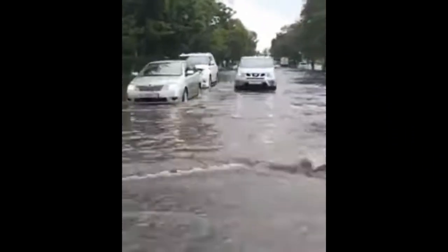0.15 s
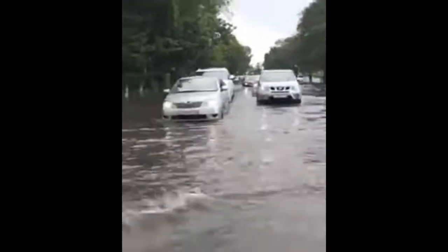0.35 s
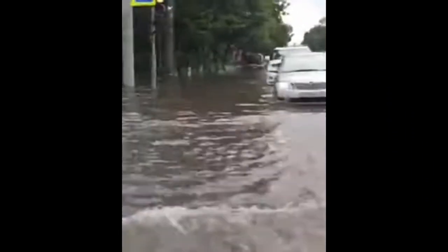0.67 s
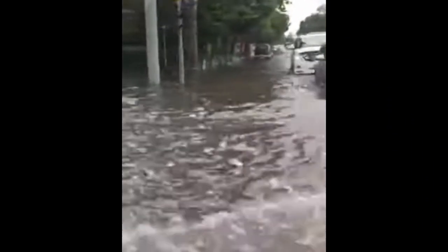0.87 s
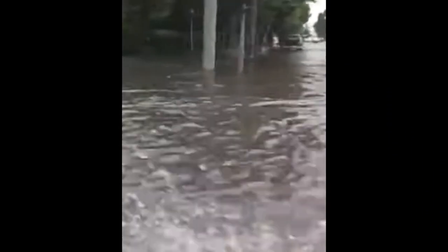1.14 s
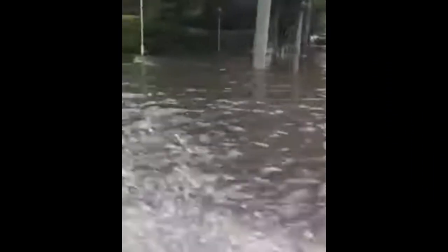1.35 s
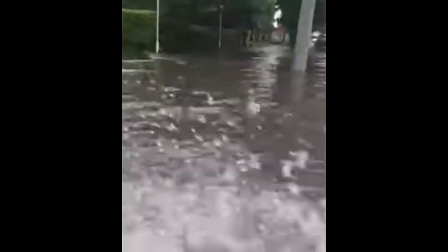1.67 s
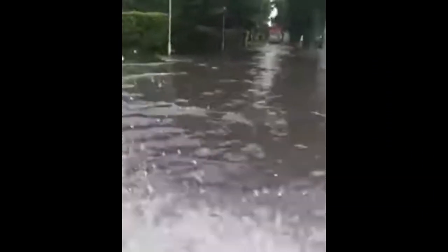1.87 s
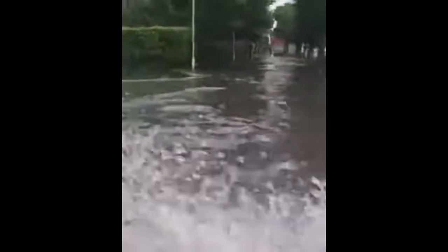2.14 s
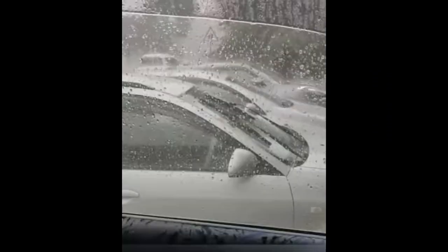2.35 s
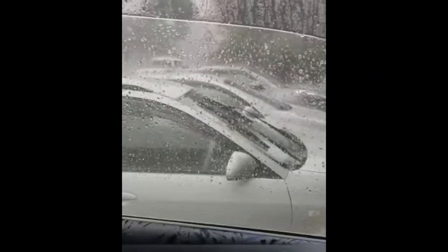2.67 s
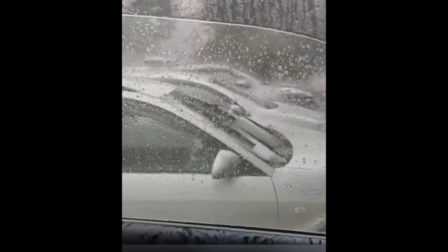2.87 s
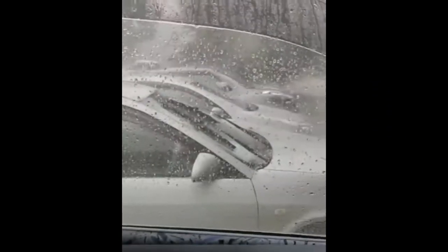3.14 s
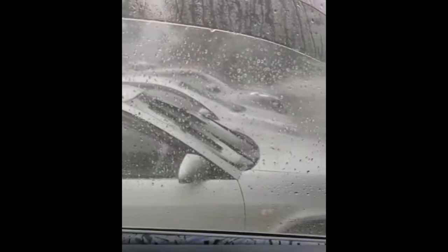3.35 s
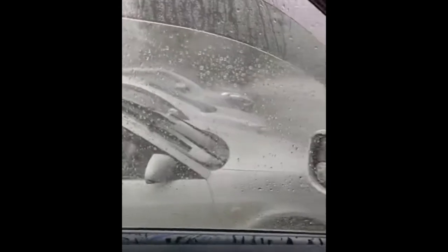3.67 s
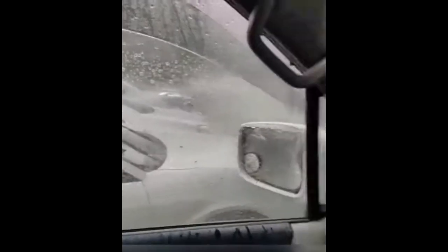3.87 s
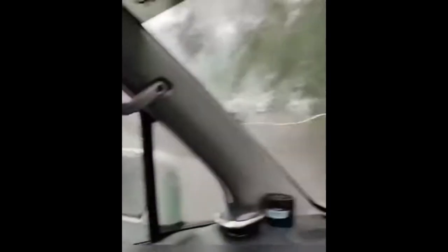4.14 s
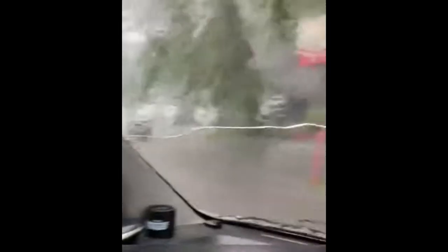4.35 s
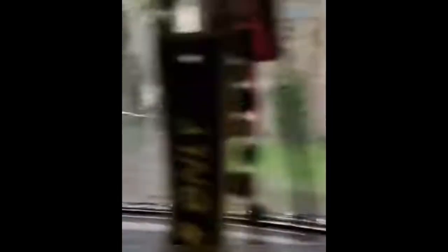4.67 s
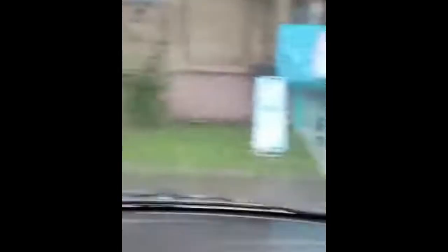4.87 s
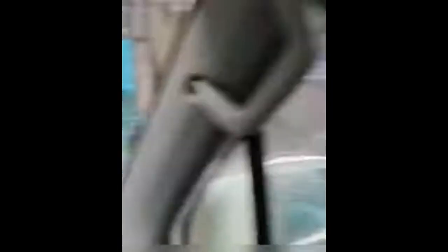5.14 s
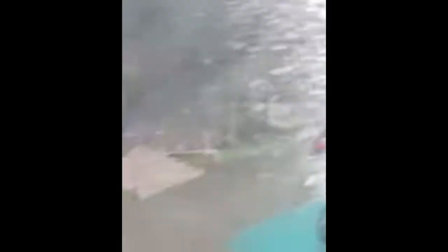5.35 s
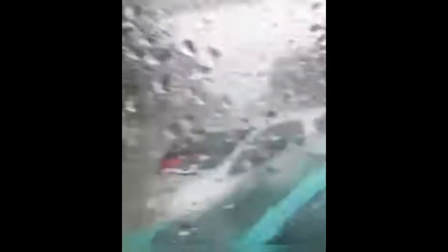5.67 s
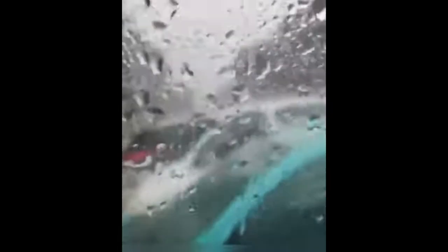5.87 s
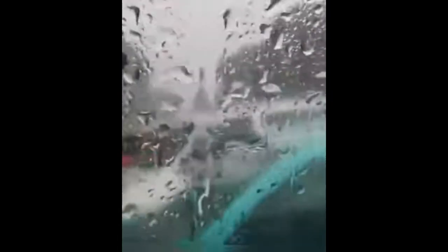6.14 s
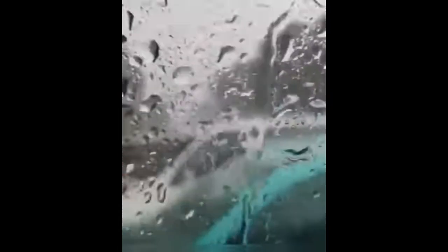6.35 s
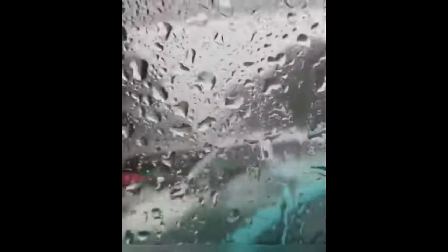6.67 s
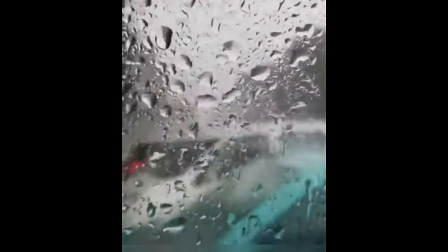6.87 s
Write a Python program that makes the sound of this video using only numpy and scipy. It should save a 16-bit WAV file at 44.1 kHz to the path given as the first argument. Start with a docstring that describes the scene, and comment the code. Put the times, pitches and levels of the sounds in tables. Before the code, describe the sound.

Loud, close splashing opens the scene as a car pushes through deep water: bubbling, fizzing foam and sheets of spray under thumping wind on the microphone. It stops suddenly, replaced by a softer downpour heard from within a shut car. Dense rain makes a dull roar overhead and a fine rattle on the windows, with scattered sharp drop taps, hissing runs of water and a slight body hum late on.

```python
"""Flooded street, then rain on a car

A car ploughs through a flood: wind buffets the microphone, bubbles ring in the churning bow wave and
spray sheets off the wheel. Then, abruptly, the inside of a closed car in a downpour: drop impacts drum
on the roof and patter on the glass, and washes of thrown water set a body panel humming in its modes."""
import sys
import numpy as np
from scipy import signal
from scipy.fft import rfft, irfft, next_fast_len
from scipy.io import wavfile
from scipy.ndimage import uniform_filter1d, map_coordinates

SR = 44100
rng = np.random.default_rng(int(sys.argv[2]) if len(sys.argv) > 2 else 0)


def wav_record(signal):
    """Record a signal, one row per channel, as 16-bit PCM in the file named by sys.argv[1]."""
    frames = np.transpose(np.atleast_2d(signal))
    bounded = np.clip(frames, -1, 1)
    # unit amplitude maps onto the largest positive 16-bit level
    quanta = np.round(bounded * 32767).astype(np.int16)
    wavfile.write(sys.argv[1], SR, quanta)


N = 309141
TIME = np.arange(N) / SR

# spectrum of the car body's dull response to water (frequency [Hz], relative density [dB])
BODY_SPECTRUM = [(13, -66), (22, -28), (65, -24), (95, -15), (125, -8), (170, -6.5), (204, -7), (246, -1),
                 (272, -6.5), (330, -5.5), (430, -2), (730, -120)]


def from_db(db):
    """Amplitude ratio: tenfold for every 20 dB."""
    return 10 ** (np.asarray(db) / 20)


def rms_one(x):
    """Normalisation to unit mean power."""
    return x / np.sqrt(np.mean(x ** 2) + 1e-20)


def curve(rows):
    """Linear interpolation of (time [s], value) rows at every sample."""
    times, values = np.transpose(rows)
    return np.interp(TIME, times, values)


def swell(centre_s, half_s):
    """Gaussian envelope of height 1, down to 1/e at half_s from its centre."""
    out = np.zeros(N)
    near = slice(*np.searchsorted(TIME, [centre_s - 4 * half_s, centre_s + 4 * half_s]))
    out[near] = np.exp(-((TIME[near] - centre_s) / half_s) ** 2)
    return out


def swells(rows):
    """Superposition of Gaussian envelopes, one track for each height column."""
    return sum(np.outer(heights, swell(centre_s, half_s)) for centre_s, half_s, *heights in rows)


def drift(corner_hz):
    """Slow random modulation: low-passed noise of rms 1."""
    step, settle = 40, 2000
    pole = np.exp(-2 * np.pi * corner_hz * step / SR)
    noise = rng.standard_normal(N // step + settle + 2)
    slow = signal.lfilter([1], [1, -2 * pole, pole * pole], noise)[settle:]
    return np.interp(np.arange(N) / step, np.arange(len(slow)), rms_one(slow))


def colour(excitation, spectrum):
    """Source and filter: impose a spectrum, falling 12 dB an octave below its first point; rms 1."""
    hz, db = np.transpose(spectrum)
    size = next_fast_len(N)
    bins = np.maximum(np.fft.rfftfreq(size, 1 / SR), 1)
    gain = from_db(np.interp(np.log(bins), np.log(hz), db)) * np.minimum(bins / hz[0], 1) ** 2
    return rms_one(irfft(rfft(excitation, size) * gain, size)[..., :N])


def band_limit(x, edges_hz, kind):
    """Second-order filter slopes: 12 dB an octave beyond each edge."""
    return signal.sosfilt(signal.butter(2, edges_hz, kind, fs=SR, output="sos"), x)


def ring(impulses, hz, t60):
    """Damped resonator: a unit impulse starts a unit sine that falls 60 dB in t60 seconds."""
    decay, angle = from_db(-60 / (t60 * SR)), 2 * np.pi * hz / SR
    return signal.lfilter([0, np.sin(angle)], [1, -2 * decay * np.cos(angle), decay ** 2], impulses + 1e-18)


def drops(per_s, spread_db):
    """Shot noise: random impacts, a few of them stronger (spread_db > 0) or weaker (< 0) than the rest."""
    spread, chance = rng.exponential(1, N), rng.random(N) * 2 - 1
    hit = np.flatnonzero(np.abs(chance) < per_s / SR)
    out = np.zeros(N)
    out[hit] = np.sign(chance[hit]) * from_db(spread_db * np.minimum(spread[hit], 5))
    return out


def pings(per_s, spread_db, low_hz, high_hz, cycles, count=18):
    """Randomly struck resonators of many pitches, each falling 60 dB over the given cycles."""
    onsets, choice = drops(per_s, spread_db), rng.integers(0, count, N)
    pitches = np.geomspace(low_hz, high_hz, count)
    return rms_one(sum(hz * ring(onsets * (choice == k), hz, cycles / hz) for k, hz in enumerate(pitches)))


def wind():
    """Turbulent pressure at the microphone port: each hard gust pushes, then pulls, for a swing or two."""
    # spectrum of the eddies (frequency [Hz], relative density [dB])
    eddy_spectrum = [(13, -46), (22, -20), (43, -57), (75, 7), (102, 8), (145, 4.5), (280, -7.5),
                     (360, -38), (620, -120)]
    # airflow over the microphone (time [s], level [dB])
    airflow = [(0, -22.5), (.28, -26), (.42, -22), (.62, -24), (1.0, -30), (1.35, -27.5), (1.8, -20.5),
               (2.15, -28.5), (2.33, -22.5)]
    # brief changes in the smaller eddies, mostly lulls (time [s], half length [s], gain [dB])
    lulls = [(.02, .03, -2), (.272, .025, 5), (.565, .014, -2), (.82, .018, -9), (1.29, .03, 0),
             (1.84, 0.013, -8)]
    # the hardest gusts (time [s], envelope peak [dB], frequency [Hz], half length [cycles])
    buffets = [(0.059, -5.5, 139, 0.51), (0.222, -10, 118, 0.7), (0.327, -10, 132, 0.6),
               (0.344, -8, 135, 0.54), (0.375, -6, 130, 0.59), (0.388, -6, 190, 0.65),
               (0.425, -7.5, 200, 0.68), (0.441, -8, 128, 0.97), (0.469, -7, 160, 0.32),
               (0.592, -15, 179, 0.9), (0.607, -5.5, 199, 0.62), (0.623, -6, 125, 0.53),
               (0.69, -10, 150, 0.97), (0.71, -10, 140, 0.76), (0.723, -4, 150, 0.79),
               (0.764, -11, 110, 0.72), (0.776, -8, 140, 0.75), (0.849, -7, 170, 0.71),
               (0.881, -4, 133, 0.52), (0.956, -8, 139, 0.73), (0.97, -8, 150, 0.94),
               (0.981, -14, 175, 0.69), (1.066, -4, 115, 0.48), (1.087, -5.5, 179, 1.1),
               (1.16, -7.5, 218, 1.4), (1.227, -7, 155, 0.44), (1.335, -7.5, 164, 0.66),
               (1.391, -7.5, 129, 0.55), (1.405, -7.5, 120, 1.3), (1.539, -7, 165, 0.48),
               (1.719, -14, 165, 0.74), (1.791, -2, 175, 0.47), (1.88, -9, 170, 1.4), (1.89, -12, 168, 1.1),
               (2.012, -12, 190, 0.61), (2.226, -10, 212, 0.71), (2.24, -8.5, 144, 0.77),
               (2.308, -9, 187, 0.65), (2.318, -12, 139, 0.64), (2.393, -9, 172, 0.44)]
    eddies = colour(rng.standard_normal(N), eddy_spectrum) * from_db(0.9 * drift(27))
    out = from_db(curve(airflow) + swells(lulls)[0]) * rms_one(eddies)
    for time_s, peak_db, hz, half_cycles in buffets:
        cycles = (TIME - time_s) * hz
        near = np.abs(cycles) < 4
        gust = np.exp(-(cycles[near] / half_cycles) ** 2)
        swing = -from_db(peak_db) * np.sin(2 * np.pi * cycles[near])
        out[near] += gust * (swing - out[near])   # the gust displaces the smaller eddies
    return band_limit(out, edges_hz=38, kind="high")   # the slowest changes leak from the port


def bow_wave(churn_db, foam_db):
    """Bubble resonance over turbulent noise: big air pockets churn low, small ones fizz in the foam."""
    # spectrum of the churning water (frequency [Hz], relative density [dB])
    churn_spectrum = [(140, 3), (230, -0.5), (370, -2.5), (560, -6), (832, -9), (1150, -17.5), (1500, -42),
                      (2530, -120)]
    # spectrum of the foam (frequency [Hz], relative density [dB])
    foam_spectrum = [(620, 4.5), (1050, -6.5), (1230, -5.5), (1600, -3), (2300, -19.5), (2990, -29),
                     (5060, -120)]
    pockets = pings(per_s=900, spread_db=1.0, low_hz=229.6, high_hz=1250, cycles=8.5)
    fizz = pings(per_s=2200, spread_db=2.0, low_hz=918, high_hz=2600, cycles=19.5)
    churn = colour(pockets + from_db(-1.0) * rng.standard_normal(N), churn_spectrum)
    foam = colour(fizz + from_db(-2.5) * rng.standard_normal(N), foam_spectrum)
    return from_db(churn_db) * churn + from_db(foam_db) * foam


def spray(level_db, splash_db, sizzle_share=0.69):
    """Impact noise: droplets fall back in surges, some trapping a bubble; a thin sizzle lies on top."""
    # tone colour of the spray: a bright hiss in treble shelves, strongest near 7 kHz
    # (frequency [Hz], relative density [dB])
    hiss_colour = [(1240, -7), (2100, -1.5), (2670, -2), (3130, -0.5), (4400, -1), (4700, -1.5),
                   (4850, -8.5), (5420, -8.5), (6030, -6.5), (6180, 1), (7000, 1.5), (7480, 0.5),
                   (7620, 6.5), (7740, -4.5), (8450, -2.5), (8650, -27), (8920, -23), (9500, -28),
                   (12400, -60), (20900, -120)]
    # tone colour of the top sizzle: a band of hiss at 11.6-14 kHz (frequency [Hz], relative density [dB])
    sizzle_colour = [(5290, -45), (9000, -24), (9820, -13.5), (11000, -19), (11300, -17.5), (11600, 4),
                     (13400, 3.5), (14200, 3), (14400, -15), (14600, -24), (15600, -21)]
    droplets = rms_one(drops(per_s=16000, spread_db=2.0))
    bubbles = pings(per_s=450, spread_db=-5.5, low_hz=2116, high_hz=5140, cycles=52)
    splash = colour(droplets + from_db(-16.5) * bubbles, hiss_colour)
    sizzle = colour(droplets, sizzle_colour) * from_db(0.33 * drift(15))
    sizzle_db = -16.5 - (1 - sizzle_share) * splash_db   # follows only a share of each splash
    surge = from_db(level_db + .6 * drift(45))
    return surge * (splash + from_db(sizzle_db) * sizzle)


def big_gulps(attack_s=0.0021, rise_per_s=2.3):
    """Free oscillation: a large air pocket pinches off and rings, rising in pitch near the surface."""
    # the biggest air pockets (time [s], level [dB], starting frequency [Hz], t60 [s])
    gulps = [(.081, -8, 356, 0.074), (.159, -9, 283, 0.054), (0.403, -7, 326, .04), (.459, -8, 414, .05),
             (.523, -10, 255, 0.08), (.648, -8, 342, .04), (0.702, -8, 385, .04), (.835, -11, 306, .06),
             (.946, -20, 318, 0.037), (1.044, -6, 458, 0.044), (1.318, -5, 330, 0.043),
             (1.476, -4.5, 342, 0.045), (1.626, -13, 282, 0.05), (1.787, -9, 289, 0.036),
             (1.874, -8, 522, 0.034), (2.222, -11.5, 350, 0.059)]
    out = np.zeros(N)
    for time_s, db, hz, t60 in gulps:
        near = (TIME > time_s) & (TIME < time_s + t60)
        age = TIME[near] - time_s
        envelope = from_db(db - 60 * age / t60) * (1 - np.exp(-age / attack_s))
        out[near] += envelope * np.sin(2 * np.pi * hz * age * (1 + rise_per_s * age / 2))
    return out


def thumps(hz=41.2, half_s=0.0048):
    """Pressure pulses: each of the largest eddies shoves the air at the microphone port once."""
    # the largest eddies (time [s], envelope peak [dB])
    eddies = [(.435, -29), (.586, -20), (.722, -26), (.877, -20), (1.064, -25), (1.086, -17)]
    return sum(from_db(db) * swell(time_s, half_s) * np.sin(2 * np.pi * (hz * TIME + rng.random()))
               for time_s, db in eddies)


def street():
    """Common modulation: the wave's size and each splash drive both foam and spray, amid the wind."""
    # size of the bow wave, growing in deeper water (time [s], level [dB])
    wave_size = [(0, -1), (.3, .5), (.7, -2), (1.15, -1.7), (1.65, 2.9), (2.15, 4), (2.27, 0.5), (2.4, 2.5)]
    # churning in the wave (time [s], level [dB])
    churning = [(0, -24.5), (.08, -20), (.3, -20), (.55, -18), (1.05, -18), (1.35, -18.5), (1.8, -21),
                (2.1, -19.5), (2.25, -19), (2.41, -21)]
    # sheets flung up by the wheel (time [s], half length [s], spray gain [dB], foam gain [dB])
    splashes = [(.065, 0.04, 4.5, 0), (.21, 0.017, 3, -6), (.32, 0.045, 1, -3), (.5, .025, -0.5, 3.5),
                (.71, 0.018, 2, 5), (.84, 0.026, 7, 2), (.878, 0.015, 1, -2), (.935, 0.024, 3, 4.5),
                (1.022, .012, 5, 3), (1.055, 0.013, 3.5, 3), (1.15, 0.027, 2, 2.5), (1.30, 0.026, 4.2, 5),
                (1.385, 0.016, 0.5, 1), (1.46, .015, 1.5, -3), (1.525, 0.018, 2, 2.5),
                (1.605, 0.017, -0.5, 3), (1.645, 0.031, 3.5, 5), (1.69, .02, 2, -4), (1.785, 0.033, 2, -3),
                (1.955, 0.028, 3.5, 2.5), (2.085, 0.025, 2.5, 7), (2.2, 0.04, 3.5, 4.5),
                (2.29, 0.021, 4, 4), (2.36, .02, 2.5, 0)]
    wave_db = curve(wave_size)
    spray_swell_db, foam_swell_db = swells(splashes)
    churn_db = curve(churning) + 0.03 * drift(22)
    foam_db = -30.5 + 0.53 * wave_db + foam_swell_db
    spray_db = -28 + wave_db + spray_swell_db + .6 * drift(26)
    return wind() + thumps() + big_gulps() + bow_wave(churn_db, foam_db) + spray(spray_db, spray_swell_db)


def rain_on(spectrum, per_s, spread_db, width_ms, echo_db, right_db, strips=5):
    """Interaural delay: each strip of a struck panel has its own lag, amid the cabin's diffuse echo."""
    hits, strip = drops(per_s, spread_db), rng.integers(0, strips, N)
    delay_ms = width_ms * (strip + rng.random(N) - strips / 2) / strips
    left_arrival = np.clip(np.arange(N) + np.round(delay_ms * SR / 1000).astype(int), 0, N - 1)
    direct = rms_one(np.array([np.bincount(left_arrival, hits, N), hits]))
    echo = from_db(echo_db) * rng.standard_normal((2, N))
    balance = from_db(right_db * np.array([[-.5], [.5]]))
    return colour(direct + echo, spectrum) * balance


def body_boom():
    """Forced vibration: the rain shakes the whole body into a low boom."""
    # strength of the boom (time [s], level [dB])
    boom_level = [(2.44, -43), (3.7, -42), (4.3, -43), (4.75, -46.5), (5.2, -42), (5.9, -44), (6.2, -41),
                  (7, -45)]
    boom = rain_on(BODY_SPECTRUM, per_s=2500, spread_db=-1.5, width_ms=0.17, echo_db=-3, right_db=-6)
    return from_db(curve(boom_level)) * boom


def roof_rain():
    """Impact noise: dense drops merge into a dull roar through the roof."""
    # response of the roof (frequency [Hz], relative density [dB])
    spectrum = [(160, -41), (280, -6), (360, -4), (412, -5), (471, 1), (564, -0.5), (675, 0), (729, -1),
                (862, -0.5), (1300, -5.5), (1690, -26), (2860, -120)]
    return rain_on(spectrum, per_s=5000, spread_db=2.5, width_ms=0.41, echo_db=-6.5, right_db=1.9)


def windscreen_rain():
    """Impact noise: the windscreen radiates its drops as a mid-range rattle."""
    # response of the windscreen (frequency [Hz], relative density [dB])
    spectrum = [(680, -14), (1150, -11), (1320, -1.5), (1700, -0.5), (2030, -3.5), (2250, -8.5),
                (2470, -8.5), (4200, -35), (5460, -53), (9240, -120)]
    return rain_on(spectrum, per_s=3200, spread_db=1.0, width_ms=0.91, echo_db=-0.5, right_db=4.0)


def sheeting_water():
    """Diffuse noise: water hisses as it sheets down the side glass."""
    # spectrum of the running sheet (frequency [Hz], relative density [dB])
    spectrum = [(2060, -4.5), (3500, -1), (4130, -5), (5690, 2.5), (6900, -6.5), (8970, -38), (15200, -120)]
    return rain_on(spectrum, per_s=3100, spread_db=-0.5, width_ms=0.68, echo_db=7.0, right_db=4.5)


def glass_patter():
    """Impact noise: fine drops on the side glass sound in the high treble."""
    # tone colour of the high patter; above 12 kHz the treble falls away steeply (frequency [Hz], relative
    # density [dB])
    tone_colour = [(3760, -34), (6400, -3.5), (7260, 1.5), (9130, -15.5), (11200, -16), (11800, -20),
                   (12000, -50), (15600, -56), (22000, -120)]
    return rain_on(tone_colour, per_s=3900, spread_db=3.5, width_ms=0.53, echo_db=5.0, right_db=3.5)


def treble_shimmer():
    """Damped sinusoids: faint, short random pings at 3-8 kHz, toward either ear, make the treble shimmer."""
    # tone colour of the pings (frequency [Hz], relative density [dB])
    tone_colour = [(2900, 8), (3600, -4), (4400, -5.5), (5600, -3), (7200, -3), (8200, -7)]
    left, right = (pings(per_s=110, spread_db=1.0, low_hz=3000, high_hz=8000, cycles=170, count=30)
                   for _ in range(2))
    return colour(np.array([left + .5 * right, right + .5 * left]), tone_colour)


def glass_taps(rain_db):
    """Modal excitation: each drop stirs the modes of the glass differently; the fattest stand out."""
    # modes of the glass (frequency [Hz], gain [dB])
    modes = [(2450, 2), (2850, 10), (3250, 5), (5600, -16)]
    # single fat drops (time [s], impact level [dB])
    fat_drops = [(2.5657, -41), (2.6555, -40), (2.864, -38), (3.0591, -39), (3.5889, -46), (3.8238, -41),
                 (3.984, -40), (4.0708, -44), (4.42, -40), (4.681, -40), (5.9545, -50), (6.2518, -41),
                 (6.4648, -43), (6.5855, -42)]
    hits = drops(per_s=60, spread_db=-6.0) * from_db(-46 + rain_db)
    for time_s, db in fat_drops:
        hits[int(time_s * SR)] += from_db(db)
    ticks = np.zeros(N)
    for hz, db in modes:
        coupling = rng.uniform(.3, 1, N) * rng.choice([-1, 1], N)
        ticks += from_db(db) * ring(hits * coupling, hz, t60=0.012)
    return band_limit(ticks, edges_hz=[1500, 4500], kind="band")


def roof_drumming(rain_db, wander_db=3.0):
    """Modal resonance: roof modes stand out in turn as the rain wanders; heavy gushes boom briefly."""
    # modes of the roof (frequency [Hz], level at full downpour [dB])
    modes = [(355, -46), (520, -47.5), (680, -47.5), (885, -40.5), (1075, -43.5), (1750, -58), (2100, -48)]
    # gushes of heavy drops (time [s], half length [s], level [dB], ringing frequency [Hz])
    gushes = [(2.904, 0.043, -30.5, 362), (3.252, .02, -27.5, 843), (3.513, 0.027, -33, 520),
              (3.89, 0.063, -31, 900), (4.014, 0.017, -35, 520), (5.15, 0.022, -33, 725),
              (6.07, 0.043, -33, 290), (6.618, 0.041, -37, 372)]
    hits = drops(per_s=2000, spread_db=1.0)
    out = np.zeros(N)
    for hz, db in modes:
        out += from_db(db + rain_db + wander_db * drift(8.2)) * rms_one(ring(hits, hz, t60=0.1))
    for time_s, half_s, db, hz in gushes:
        gush = swell(time_s, half_s)
        ringing = gush * ring(hits, hz, t60=0.016)   # damped by its own water
        out += from_db(db) * ringing * np.sqrt(np.sum(gush ** 2) / np.sum(ringing ** 2))
    return band_limit(out, edges_hz=[260, 3000], kind="band")


def panel_hum(waver_share=0.0245):
    """Mass loading: running water shakes a panel's modes, and its weight makes their pitch waver."""
    # modes of the panel (frequency [Hz], relative level [dB], t60 [s])
    modes = [(176.4, 2, 0.3), (167, -7, 0.22), (241, 2.5, 0.15)]
    shaking = colour(rng.standard_normal(N), BODY_SPECTRUM)
    hum = sum(from_db(db) * rms_one(ring(shaking, hz, t60)) for hz, db, t60 in modes)
    warped_time = TIME + waver_share * np.cumsum(drift(2.95)) / SR
    hum = np.interp(warped_time, TIME, hum)
    running_power = uniform_filter1d(hum ** 2, size=SR // 5)
    return hum / np.sqrt(running_power + .01)   # evens out the level


def cabin():
    """Superposition: roof, glass and body radiate into the cabin under rain and thrown water."""
    # strength of the downpour (time [s], level [dB])
    downpour = [(2.44, 0), (3.35, -1.5), (3.7, 1.4), (4.05, -0.5), (4.45, -0.9), (4.8, -3.5), (5.1, -3.5),
                (5.3, -4), (5.95, -3.5), (6.6, -3), (7.0, -4)]
    # water thrown over the car
    # (time [s], half length [s], side glass gain [dB], windscreen gain [dB], roof gain [dB], hum gain [dB])
    washes = [(2.5, .1, 5.5, -1.5, -0.5, 0), (2.7, 0.14, 7, 0, 0, 1), (2.91, .1, 7.5, 0.5, 0.5, 1),
              (3.3, 0.24, -3.5, 1.5, 1.5, -1), (3.9, 0.07, -4, 1, 0, -5), (5.42, 0.15, 1, 1.5, -0.5, 8),
              (5.85, .2, -1, -1, -1, 7), (6.06, 0.06, 3.5, 3, 2, 10), (6.2, 0.039, 3, 1.5, 2.5, 12),
              (6.3, 0.043, 4, 4.5, 2.5, 3), (6.5, 1, 8.5, 0.9, 0.4, 10.5), (6.53, 0.15, -0.5, 0.5, 0, 8.5)]
    # strength of the patter on the side glass (time [s], level [dB])
    patter = [(2.44, -7), (2.95, -5.5), (3.08, -1), (3.3, -1.5), (3.5, 0.5), (4.1, 1), (4.5, 0.5),
              (4.9, -1.5), (5.7, -3), (6.3, -3.5), (7, -5.5)]
    # fine spray against the side glass (time [s], half length [s], gain [dB])
    spatters = [(3.028, .028, 9), (4.05, .012, 2), (4.125, .012, 2), (5.82, 0.01, 7), (6.005, .012, 1),
                (6.6, .01, 4), (6.97, .015, 5)]
    # where the rain is centred (time [s], lag of the right ear [ms])
    bearing = [(2.4, 0.23), (4.9, 0.23), (5.6, 0.27), (7, 0.39)]
    rain_db = curve(downpour) + .55 * drift(17)
    side_wash_db, screen_wash_db, roof_wash_db, hum_wash_db = swells(washes)
    sheet_db = -55 + rain_db + side_wash_db + 1.5 * drift(20)
    patter_db = curve(patter) + swells(spatters)[0]
    glass_db = -53.5 + patter_db + 1.4 * drift(28)
    left, right = (body_boom()
                   + from_db(-29.5 + rain_db + roof_wash_db) * roof_rain()
                   + from_db(-35 + rain_db + screen_wash_db) * windscreen_rain()
                   + from_db(sheet_db) * sheeting_water()
                   + from_db(glass_db) * glass_patter()
                   + from_db(-56 + patter_db) * treble_shimmer()
                   + glass_taps(rain_db)
                   + roof_drumming(rain_db)
                   + from_db(-59.5 + hum_wash_db) * panel_hum())
    lag_samples = curve(bearing) * SR / 1000
    return np.array([left, map_coordinates(right, [np.arange(N) - lag_samples], order=3)])


def scene(cut_s=2.410, street_fade_s=.001, cabin_rise_s=2.415, cabin_fade_s=.02):
    """Gating: the flooded street, alike in both ears, gives way at once to the stereo cabin."""
    outside = np.exp(-np.maximum(TIME - cut_s, 0) / street_fade_s)
    inside = np.clip((TIME - cabin_rise_s) / cabin_fade_s, .3, 1) * (TIME > cut_s)
    return outside * street() + inside * cabin()


def record(dry, ceiling=.95, cutoff_hz=15550):
    """Soft saturation rounds the highest peaks; a steep low-pass removes the top treble."""
    rounded = dry / (1 + (dry / ceiling) ** 6) ** (1 / 6)
    return signal.sosfilt(signal.ellip(10, .1, 80, cutoff_hz, fs=SR, output="sos"), rounded)


dry = scene()
out = record(dry)
wav_record(out)
```